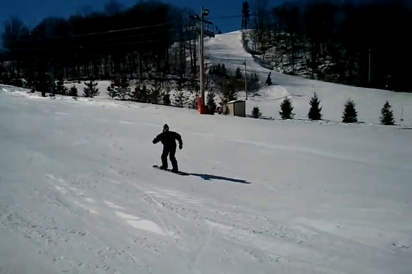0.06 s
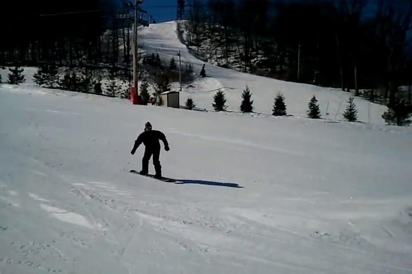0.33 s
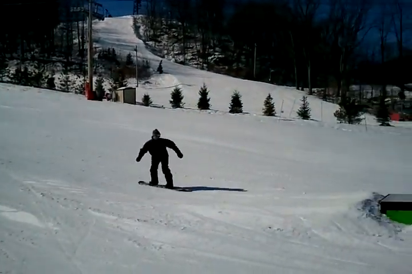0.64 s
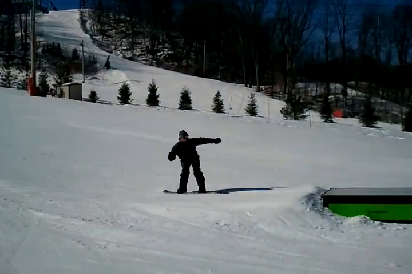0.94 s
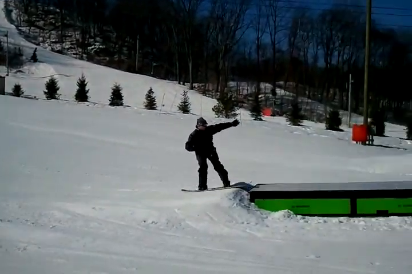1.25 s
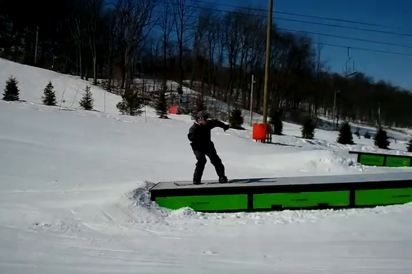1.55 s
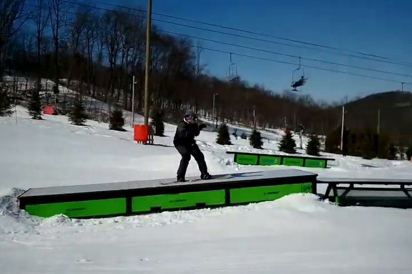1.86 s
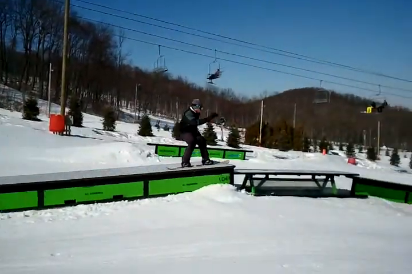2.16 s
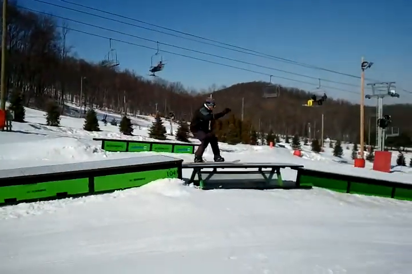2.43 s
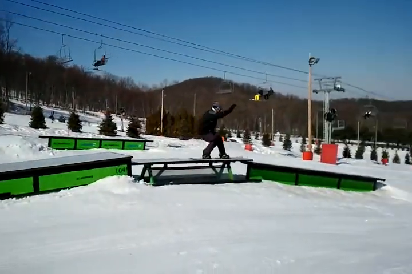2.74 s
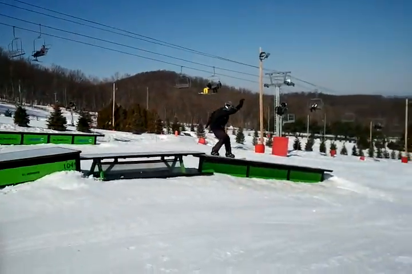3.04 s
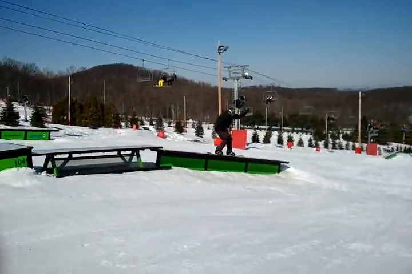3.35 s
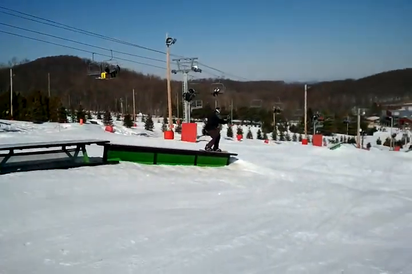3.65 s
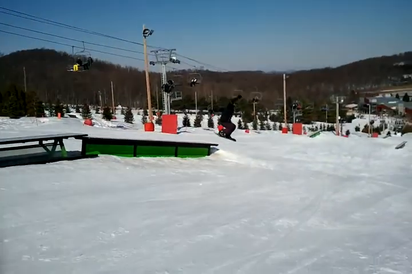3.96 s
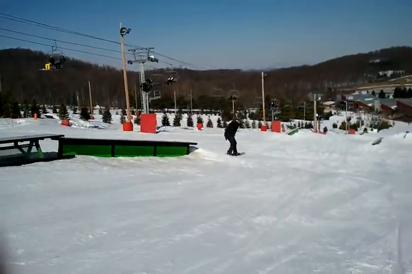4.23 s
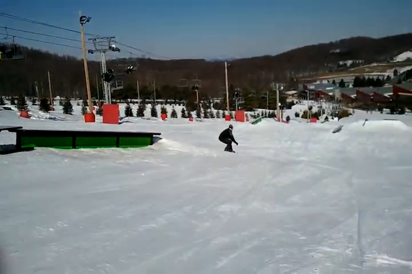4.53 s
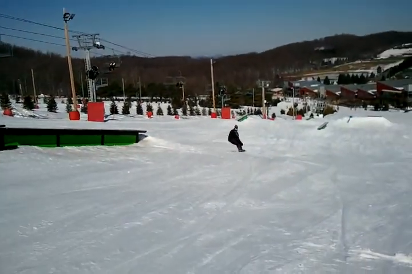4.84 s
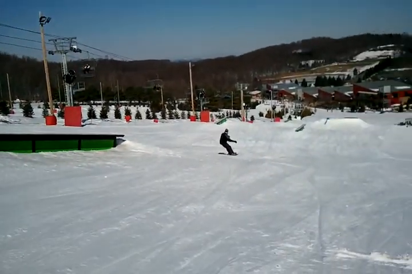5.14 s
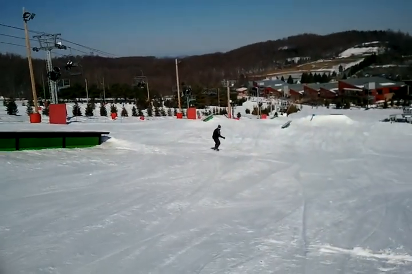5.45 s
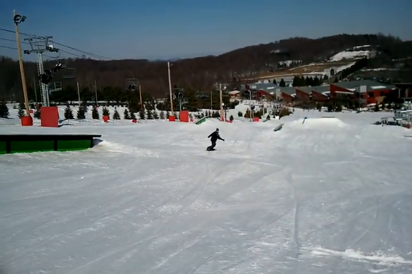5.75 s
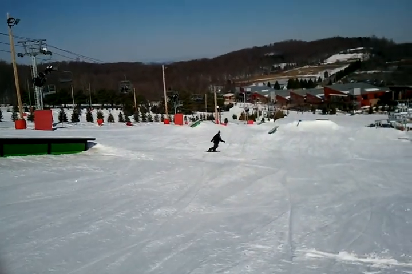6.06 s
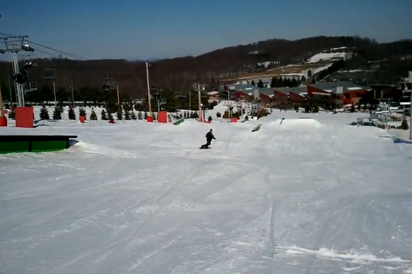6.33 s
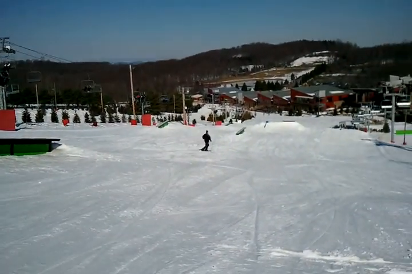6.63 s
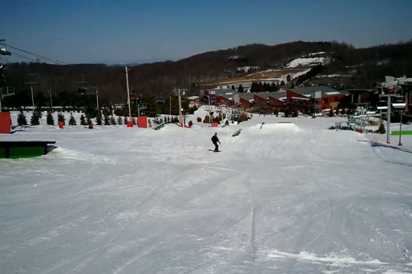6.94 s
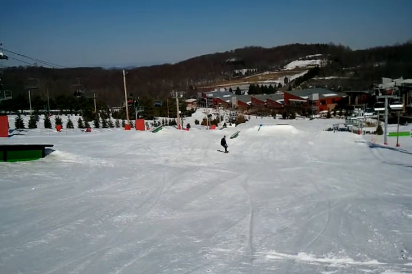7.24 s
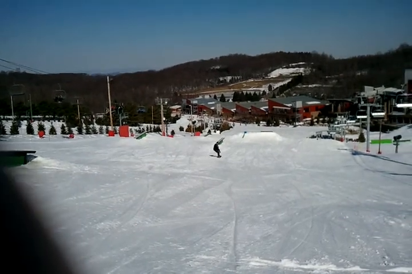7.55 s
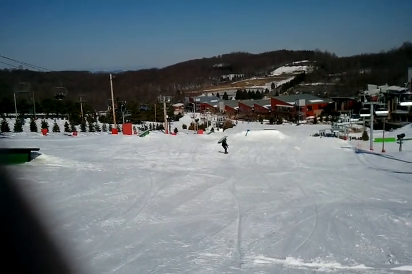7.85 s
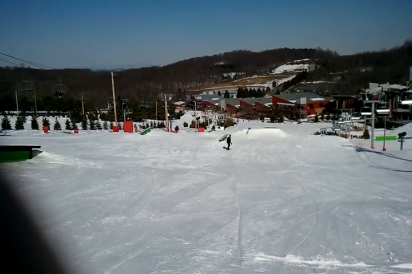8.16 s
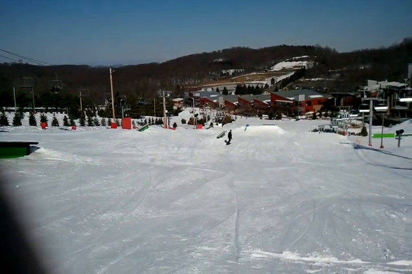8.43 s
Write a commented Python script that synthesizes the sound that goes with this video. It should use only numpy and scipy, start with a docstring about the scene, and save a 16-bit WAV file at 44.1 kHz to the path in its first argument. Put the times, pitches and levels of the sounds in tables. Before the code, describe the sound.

A snowboard approaches with a grainy hiss over packed snow, then clatters onto a hollow box. Short edge scrapes, sharp knocks with a steely ring and low booms follow as it crosses a table and a second box. It lands with a smack and carves away down the ski slope, fading. Wind rumbles and bumps on the small microphone, and something clicks once close by near the end.

```python
"""First comes the hiss of a snowboard sliding over packed snow, breaking tiny grains as it goes.
It clatters onto a box, crosses a table and a second box, lands and carves away. Each hit rings the
hollow board and box and the steel edge; heavy blows boom, and edges rasp as they stick and slip.
Wind bumps the small microphone, which the hardest knocks overload. Something clicks close by,
and a ski lift hums far off."""
import sys
import numpy as np
from scipy import signal
from scipy.fft import rfft, irfft
from scipy.io import wavfile

SR = 44100
rng = np.random.default_rng(int(sys.argv[2]) if len(sys.argv) > 2 else 0)


def master(y):
    """Save y as 16-bit WAV."""
    cut = np.clip(np.atleast_2d(y).T, -1, 1)
    pcm = np.round(cut * 32767)  # scale
    wavfile.write(sys.argv[1], SR, pcm.astype(np.int16))


N = 374409

# How strong each noise is from low to high pitch: f/Hz, relative level/dB
BASE_SPECTRUM = [(1800, -25.5), (3000, -3.5), (3400, -3), (3700, 1), (4500, 0.5), (5600, -1), (6400, 1),
                 (7500, 8.5), (8500, -6.5)]  # the board's underside sliding
SPRAY_SPECTRUM = [(3500, -31.5), (5000, -9), (5700, 4), (7000, 4.5), (8500, -9.5)]  # loose snow thrown up
GRIND_SPECTRUM = [(100, -7), (290, 2.5), (450, -2), (680, 2.5), (1350, 2.5), (2500, -1.5), (4300, -13),
                  (6500, -18.5)]  # the edges grinding
PLOUGH_SPECTRUM = [(120, -18), (220, -2.5), (310, -1.5), (430, -7), (620, -4.5), (1000, -25.5)]  # snow shoved aside
CRACK_SPECTRUM = [(300, -3), (1000, -6), (2000, 8.5), (4500, 1.5), (6000, 5), (7500, 6), (9000, -6)]  # the sharp part of a knock
RASP_SPECTRUM = [(200, -15), (800, -2.5), (2400, 1), (3600, -3), (5000, -4), (7600, 2.5), (9000, -25)]  # an edge catching
WIND_SPECTRUM = [(20, -14.5), (55, -4.5), (100, -1), (190, -6), (300, -12), (500, -26.5), (1000, -56)]  # air rumbling on the microphone
SLOPE_SPECTRUM = [(30, -13), (110, 2), (400, -1.5), (650, 3), (1100, -8), (2000, -28.5), (3000, -3),
                  (4200, -32.5), (5500, -11), (7500, -14.5)]  # the distant slope

# Modes, the notes a thing rings at: f/Hz, relative level/dB, t60/s (the time to fade by 60 dB)
BOARD_MODES = [(1810, 0.0096, .012), (2530, 0.0031, .011), (3740, 0, .014)]  # the sliding board
BODY_MODES = [(348.5, -2.5, 0.024), (516, -8.5, 0.056), (614, -3.5, 0.059), (714, -1.5, 0.053),
              (823, -5.5, 0.011), (931, -4, 0.043), (1090, 3.5, 0.017), (1265, 5, 0.016),
              (1444, -11, 0.085), (1550, -2.5, 0.053), (1693, -1.5, 0.025), (1858, -2, 0.038),
              (1966, -5.5, 0.01), (2304, 0.5, 0.02), (2506, -9, 0.029)]  # board and box together
STEEL_MODES = [(3697, 12, 0.042), (3520, -14, 0.017), (4540, -15, 0.044)]  # the steel edge
CLICK_MODES = [(2200, -12, .003), (3340, -8, .004), (5100, -6, .004), (6460, 4, .005)]  # something small and hard
# The bending notes of a boom: multiple of its pitch, relative level/dB
BEND_MODES = [(.66, -9.5), (.86, -8), (1, 0.5), (1.35, -4), (1.85, -8.5)]

# The rider leans to steer, land or carve: middle t/s, half width/s, extra hiss/dB, extra grinding/dB
LEANS = [(.35, 0.27, 2, -3.5), (.79, 0.21, 5, 2.5), (1.28, 0.12, 4.5, 1.5), (1.82, .2, 8.5, 2.5),
         (2.4, 0.38, 6, -0.5), (3.22, 0.21, 5, 7), (3.95, 0.22, 5, 0.5), (4.48, 0.13, 4.5, 8.5),
         (4.99, 0.16, 3, 5), (5.37, 0.14, 9, 14.5), (6.13, 0.19, 12.5, 11), (6.5, 0.14, 15, 10.5),
         (7.6, 0.3, 0.5, 1)]
# The board leaves the ground: take-off t/s, landing t/s, change in sliding noise/dB
HOPS = [(1.512, 1.643, -4.5), (2.555, 2.74, -7), (4, 4.398, -7)]
# How much loose snow sprays: t/s, level against the underside's hiss/dB
SPRAY_LEVELS = [(.95, -9), (1.2, -1), (1.5, -0.5), (1.7, -25), (3.2, -5), (5.3, -4), (6.5, -1),
                (8.49, -0.5)]
# The board hits box, table or snow: t/s, relative level/dB, contact time/s, body ring/dB, steel ring/dB
KNOCKS = [ (1.6273, -10, .0003, -7.5, -19), (1.6377, -8.5, 0.0014, -6.5, -23),
          (1.6754, -5, .009, -11.5, -19), (1.72, -22.5, 0.0043, -6.5, 2.5), (2.004, -24, .0012, -15, -20),
          (2.601, -28, 0.0019, -17, -9.5), (2.6061, -14.5, 0.0021, -2.5, -0.5),
          (2.6323, -6.5, 0.0032, -12, 2), (2.64, -17, 0.0037, -2.5, -13), (2.6693, -4, .0016, -2, -21),
          (2.6742, -4, 0.0028, -9, -29.5), (2.689, -13.5, .008, -0.5, -15), (2.7019, -7, 0.007, -6.5, -15),
          (2.742, -21, 0.0021, -10, -18), (2.7894, -13.5, 0.00058, -2.5, -23),
          (2.914, -20.5, 0.0017, -5.5, -25), (3.022, -21, 0.0014, -5, -18), (3.235, -29, .0017, -12, -16),
          (3.2649, -13.5, 0.00097, -9, -26), (3.2735, -11, .0056, -2, -9), (3.984, -18, .0006, -14, -10),
          (4.094, -36, .001, -16, -21.5), (4.116, -34, .0022, -14, -20),
          (4.399, -13.5, 0.0043, -1.5, -14.5), (4.409, -13.5, 0.0025, -15.5, -14),
          (4.422, -24, .005, -8, -19.5)]
# A light tick while riding the boxes: the same columns without t/s
BOX_TICK = (-28, 0.01, -20.5, -20)
# Deck or board booms under the rider's weight: t/s, relative level/dB, t60/s, f/Hz
BOOMS = [(1.68, -22.5, 0.13, 172.4), (2.633, -23, 0.061, 228), (2.675, -24.5, .1, 238.5),
         (2.709, -24, 0.19, 203.5), (2.734, -26, 0.3, 190.6), (2.794, -22, 0.14, 246.4),
         (2.816, -19, 0.059, 135), (3.276, -23, 0.22, 191), (4.397, -19, 0.087, 316),
         (4.402, -18.5, 0.04, 615)]
# An edge catches: t/s, length/s, relative level/dB, squeal against the rasp/dB
RASPS = [(1.648, 0.074, -24, -11), (2.469, .063, -29, -2.5), (2.525, 0.031, -28.5, 2.5),
         (3.005, 0.019, -33.5, -16), (3.184, .023, -32.5, -15), (3.272, 0.071, -32, -10),
         (3.979, 0.036, -34.5, -14), (4.105, 0.14, -38, -24), (4.171, 0.014, -33, -11),
         (4.434, .16, -43, -18)]
# The low rumble swells with wind gusts, and at 1.75 s with the boom of the board landing on the box:
# middle t/s, half width/s, extra rumble/dB
RUMBLE_SWELLS = [(.03, 0.066, 8.5), (1.1, 0.19, 9.5), (1.75, 0.063, 16.5), (2.18, 0.27, 9),
                 (2.8, 0.38, 15.5), (3.55, 0.1, 10.5), (4.37, 0.12, 8.5), (4.82, 0.39, 11), (5.35, .12, 6),
                 (5.9, 0.089, 9), (6.2, 0.26, 11)]
# The strongest swirls of air bump the microphone: t/s, level/dB, f/Hz
STRONG_SWIRLS = [(1.09, -31, 230), (2.083, -27, 131), (2.232, -24.5, 142), (2.493, -24, 145),
                 (2.538, -20, 135), (2.99, -25, 150), (3.574, -28.5, 120), (4.573, -25, 149),
                 (4.69, -19.5, 176), (4.776, -29, 170), (4.959, -21, 136), (5.019, -21.5, 161),
                 (5.926, -25.5, 117), (6.213, -26.5, 113), (7.807, -29.5, 116)]
# The hum of the lift's drive: t/s, level/dB
HUM_LEVELS = [(0, -68), (3, -64), (5.2, -60.5), (5.7, -60), (6.8, -57.5), (7.5, -62.5), (8.49, -66.5)]
# Thin far whines set in and hold: start t/s, f/Hz, level/dB
WHINES = [(8.13, 1986, -67.5), (8.36, 2470, -64)]
# What the small microphone behind its opening boosts and cuts: f/Hz, gain/dB
MIC_RESPONSE = [(1500, 0), (1830, 2), (2150, -0.5), (2450, 3.5), (2950, -6), (3450, 4), (3720, 4),
                (4100, 9.5), (4750, 15), (5300, 10.5), (5650, 1.5), (5900, -0.5), (6270, -7.5),
                (6700, -8.5)]


def scene():
    """Everything that reaches the microphone, as one channel."""
    return (sliding() + rasps() + knocks() + booms() + click() + wind_and_rumble() + ski_area())[None]


def sliding():
    """The board hisses, rings, grinds and ploughs through snow, louder when the rider leans on it."""
    ridge_flutter_db = .8 * wander(rate_hz=50) + .6 * wander(rate_hz=12)
    far = distance_doublings()
    base = colour(grains(per_s=6000, spread_db=5.5, rush=1.07), BASE_SPECTRUM)
    spray = colour(grains(per_s=2800, spread_db=6, rush=1.1), SPRAY_SPECTRUM) * amp(follow(SPRAY_LEVELS))
    edges = colour(grains(per_s=2700, spread_db=2.5, rush=1.08), GRIND_SPECTRUM)
    # With distance the ringing fades fastest; the low scrunch of ploughing does not fade.
    hiss = (base + spray) * amp(-43 - 8.5 * far)
    ringing = unit(ring(rng.standard_normal(N), BOARD_MODES, detune=.003)) * amp(-52 - 13 * far)
    grind = edges * amp(-48.5 - 4.5 * far)
    plough = colour(rng.standard_normal(N), PLOUGH_SPECTRUM) * amp(-61.5)
    glide = (hiss + ringing) * amp(swells(LEANS, column=2))
    carve = (grind + plough) * amp(swells(LEANS, column=3))
    return (glide + carve) * amp(airborne_db() + ridge_flutter_db)


def grains(per_s, spread_db, rush):
    """Snow grains break under the board: clicks of uneven size over an even rush."""
    size = amp(spread_db * np.minimum(rng.exponential(1, N), 4))
    clicks = size * rng.choice([-1, 1], N) * (rng.random(N) < per_s / SR)
    return unit(unit(clicks) + rush * rng.standard_normal(N))


def distance_doublings(pass_s=1.423, nearest_m=6.53, speed_m_per_s=5.78):
    """The rider passes in a straight line: how many times the distance has doubled from its nearest."""
    along_m = speed_m_per_s * (np.arange(N) / SR - pass_s)
    return np.log2(np.hypot(nearest_m, along_m) / nearest_m)


def airborne_db(fade_s=0.0376):
    """The sliding noise drops while the board is off the ground."""
    return sum(follow([(up, 0), (up + fade_s, db), (down - fade_s, db), (down, 0)])
               for up, down, db in HOPS)


def knocks(release_t60=0.022, scatter_db=-23, scatter_t60=0.36):
    """Each slap is a burst of tiny contacts that cracks, and rings the hollow body and the steel."""
    out, t = np.zeros(N), np.arange(SR // 4) / SR
    ticks = [(s, *BOX_TICK) for s in moments(per_s=5) if 1.7 < s < 3.3]
    for s, db, contact_s, body_db, steel_db in KNOCKS + ticks:
        after = np.maximum(t - contact_s, 0)
        pressure = amp(-60 * after / release_t60) + amp(scatter_db - 60 * after / scatter_t60)
        force = pressure * rng.choice([-1, 1], len(t))
        crack = amp(-5) * unit(colour(force, CRACK_SPECTRUM))
        body = amp(body_db) * unit(ring(force, BODY_MODES, detune=0.039))
        steel = amp(steel_db - 7) * unit(ring(force, STEEL_MODES, detune=0.005))
        add(out, s, amp(db - 2) * rms(pressure) * (crack + body + steel))
    return out


def booms(push_s=0.0013):
    """A heavy blow makes the deck or board bend to and fro at a few low notes."""
    out, t = np.zeros(N), np.arange(SR // 3) / SR
    push = t * np.exp(-2 * np.pi * t / push_s)
    for s, db, t60, hz in BOOMS:
        modes = [(hz * multiple, mode_db, t60) for multiple, mode_db in BEND_MODES]
        swing = unit(ring(push, modes, detune=0.075))
        fade = amp(-60 * t / t60)
        add(out, s, amp(db) * rms(fade) * swing)
    return out


def rasps():
    """An edge sticks and slips for a moment; on the box its steel starts to squeal."""
    out, flutter = np.zeros(N), amp(1.2 * wander(rate_hz=110))
    slips = flutter * grains(per_s=4000, spread_db=3, rush=0.28)
    for s, length_s, db, squeal_db in RASPS:
        pressure = np.pad(signal.windows.tukey(round(length_s * SR), .35), (0, SR // 10))
        force = pressure * slips[round(s * SR):][:len(pressure)]
        scrape = unit(colour(force, RASP_SPECTRUM))
        squeal = amp(squeal_db) * unit(ring(force, STEEL_MODES, detune=.001))
        add(out, s, amp(db - 5.5) * rms(pressure) * (scrape + squeal))
    return out


def click(at_s=7.0202, level_db=-17.5):
    """One tick of something small and hard beside the microphone."""
    out = np.zeros(N)
    tick = ring(signal.unit_impulse(SR // 50), CLICK_MODES, detune=0.0056)
    add(out, at_s, amp(level_db) * tick / abs(tick).max())
    return out


def wind_and_rumble(lull_db=-55.5, calming_from_s=6.2, calming_db_per_s=5, bump_cycles=0.6, skew=0.33):
    """A lumpy rumble swells with gusts and the landing on the box; swirls of air bump the microphone."""
    calming_db = calming_db_per_s * np.maximum(np.arange(N) / SR - calming_from_s, 0)
    rumble_db = lull_db - calming_db + swells(RUMBLE_SWELLS, column=2)
    lumps_db = 4.2 * np.minimum(wander(rate_hz=28), 1.7)
    out = colour(rng.standard_normal(N) * amp(rumble_db + lumps_db), WIND_SPECTRUM)
    t = np.arange(-SR // 25, SR // 25) / SR
    # Weaker swirls come by chance, at 140 Hz and 13 dB above the rumble.
    weak_swirls = [(s, rumble_db[int(s * SR)] + 13, 140) for s in moments(per_s=4.5) if s + t[0] > 0]
    for s, db, hz in STRONG_SWIRLS + weak_swirls:
        cycles = hz * t
        phase = 2 * np.pi * (cycles + rng.random())
        wave = np.sin(phase) + skew * np.sin(2 * phase)
        add(out, s + t[0], amp(db) * wave / np.cosh(2 * cycles / bump_cycles))
    return out


def ski_area(hum_hz=522.2, whine_rise_s=0.07):
    """Far off, the lift's drive hums and thin whines set in over the dull wash of the slope."""
    t = np.arange(N) / SR
    hum = tone(hum_hz) * amp(follow(HUM_LEVELS) + 2 * wander(rate_hz=2.78))
    whines = sum(amp(db) * np.clip((t - s) / whine_rise_s, 0, 1) * tone(hz) for s, hz, db in WHINES)
    wash = amp(-54.5) * colour(rng.standard_normal(N), SLOPE_SPECTRUM)
    return hum + whines + wash


def tone(hz):
    """A pure note that wavers slightly, with an average size of 1."""
    wavering_hz = hz * (1 + 0.00125 * wander(rate_hz=5.15))
    return np.sqrt(2) * np.sin(2 * np.pi * np.cumsum(wavering_hz) / SR)


def ring(force, modes, detune):
    """A force sets fading notes ringing; each spot of contact shifts them a little and may flip them."""
    t = np.arange(min(len(force), SR // 3)) / SR
    response = np.zeros(len(t))
    for hz, db, t60 in modes:
        sign = rng.choice([-1, 1])
        shifted_hz = hz * (1 + detune * (2 * rng.random() - 1))
        response += sign * amp(db - 60 * t / t60) * np.cos(2 * np.pi * shifted_hz * t)
    return signal.fftconvolve(force, response)[:len(force)]


def colour(x, spectrum):
    """Gives plain noise or clicks a spectrum and keeps their power."""
    taps = filter_taps(spectrum)
    return signal.oaconvolve(x, taps / np.linalg.norm(taps))[:len(x)]


def filter_taps(spectrum, size=4096):
    """A filter with the given gains that responds as early as it can (minimum phase)."""
    hz, db = np.transpose(spectrum)
    grid_hz = abs(np.fft.fftfreq(size, 1 / SR)) + 1
    log_gain = np.log(amp(np.interp(np.log(grid_hz), np.log(hz), db)))
    response = np.exp(np.conj(signal.hilbert(log_gain)))
    return np.fft.ifft(response).real[:size // 2]


def wander(rate_hz):
    """A smooth random drift with an average size of 1, mostly slower than the rate."""
    hz = np.fft.rfftfreq(N, 1 / SR)
    return unit(irfft(rfft(rng.standard_normal(N)) * np.exp(-(hz / rate_hz) ** 2), N))


def moments(per_s):
    """Random times in seconds, so many a second on average."""
    return np.flatnonzero(rng.random(N) < per_s / SR) / SR


def swells(rows, column):
    """Adds up bell-shaped curves, one a row (middle t/s, half width/s, ...); the column gives heights."""
    t = np.arange(N) / SR
    return sum(row[column] * np.exp(-((t - row[0]) / row[1]) ** 2) for row in rows)


def follow(points):
    """Joins points (t/s, value) with straight lines."""
    times, values = np.transpose(points)
    return np.interp(np.arange(N) / SR, times, values)


def add(mix, s, sound):
    """Mixes a sound in at s seconds."""
    part = mix[round(s * SR):][:len(sound)]
    part += sound[:len(part)]


def amp(db):
    """Turns decibels into a gain."""
    return 10 ** (np.asarray(db) / 20)


def rms(x):
    """A signal's average size (root mean square)."""
    return np.sqrt(np.mean(x ** 2) + 1e-20)


def unit(x):
    """Scales to an average size of 1."""
    return x / rms(x)


def low_pass(x, hz, size):
    """Cuts the treble above hz; a larger size cuts more steeply."""
    return signal.oaconvolve(x, signal.firwin(size, hz, window=("kaiser", 8), fs=SR)[None], "same")


def record(dry, low_cut_hz=42, ceiling=.73):
    """The small microphone boosts some pitches, loses the extremes and overloads on the loudest knocks."""
    heard = signal.sosfilt(signal.butter(2, low_cut_hz, "highpass", fs=SR, output="sos"), dry)
    heard = signal.oaconvolve(heard, filter_taps(MIC_RESPONSE)[None])[:, :N]
    heard = low_pass(heard, hz=8600, size=161)
    overloaded = np.clip(heard, -ceiling, ceiling)
    return low_pass(overloaded, hz=16000, size=255)


dry = scene()
out = record(dry)
master(out)
```